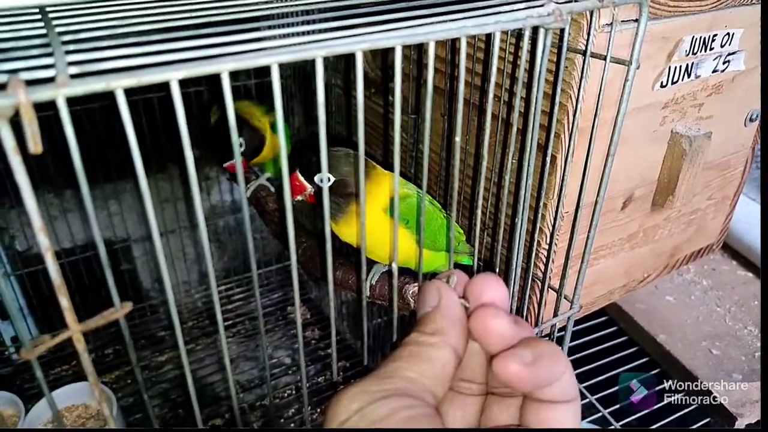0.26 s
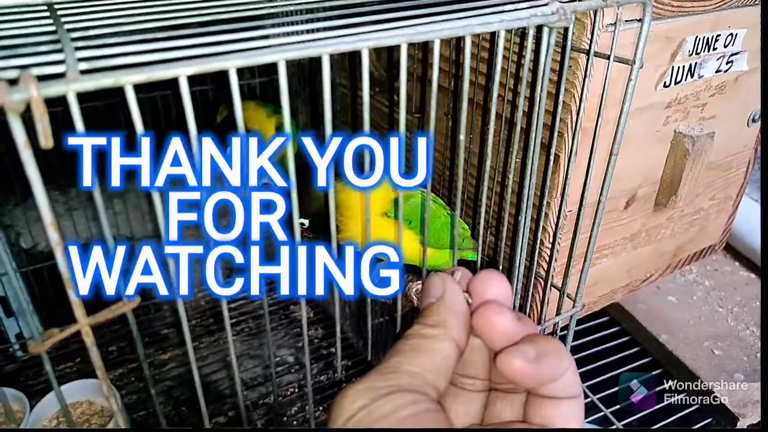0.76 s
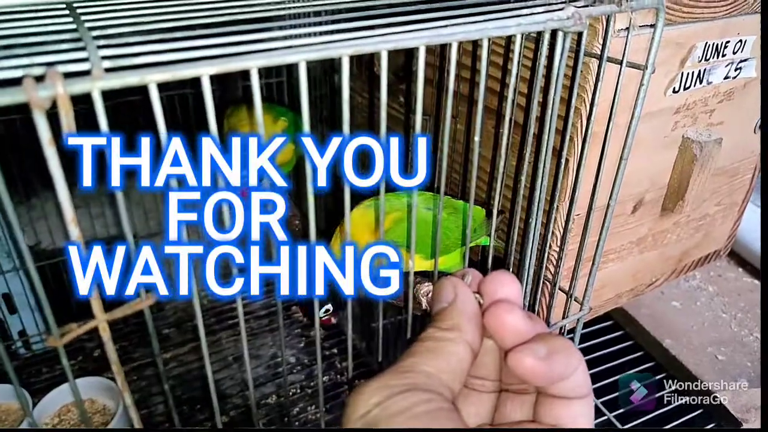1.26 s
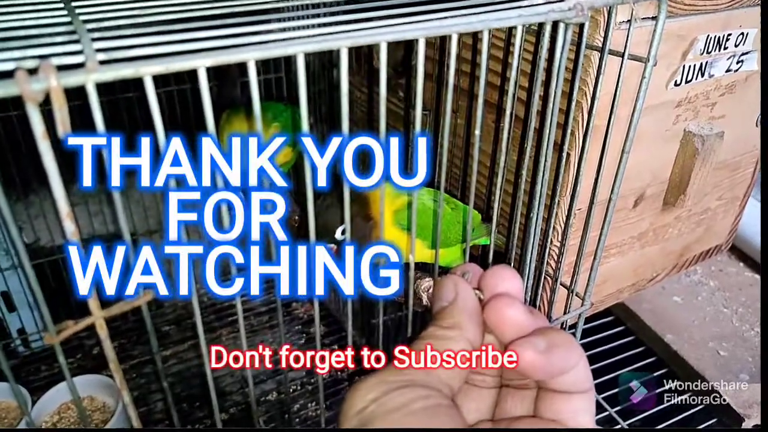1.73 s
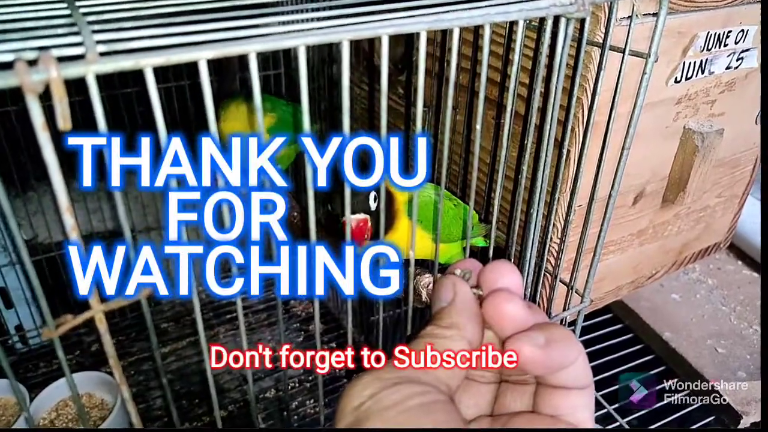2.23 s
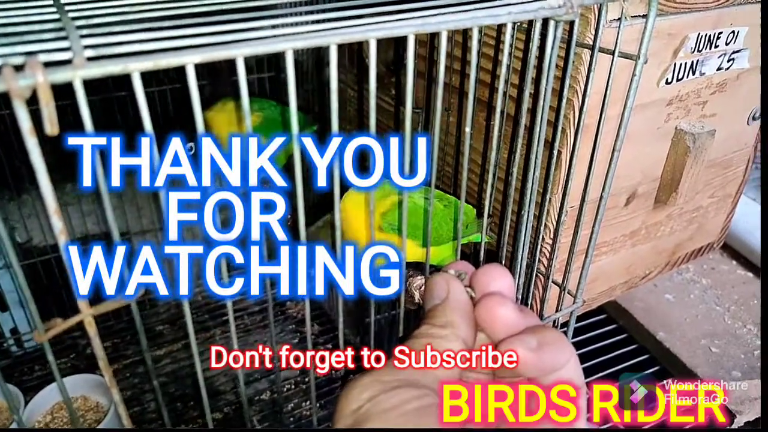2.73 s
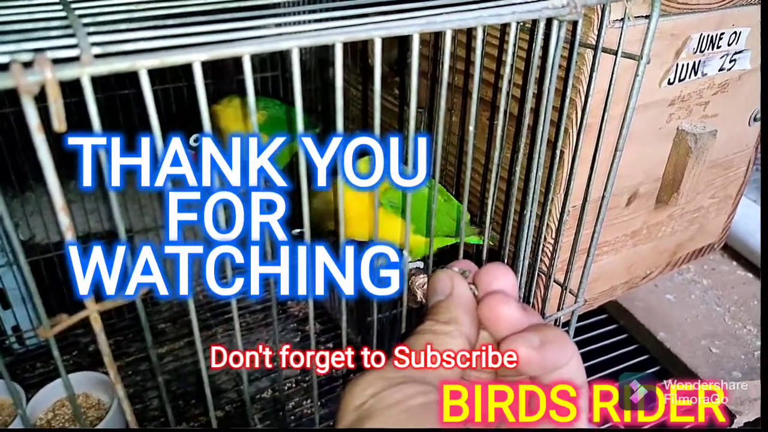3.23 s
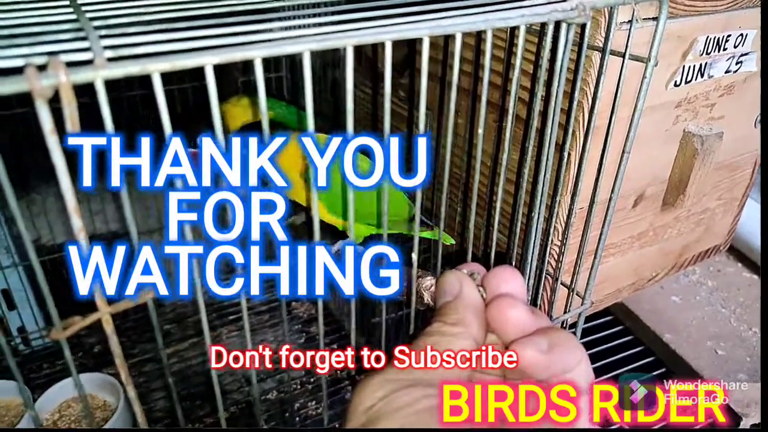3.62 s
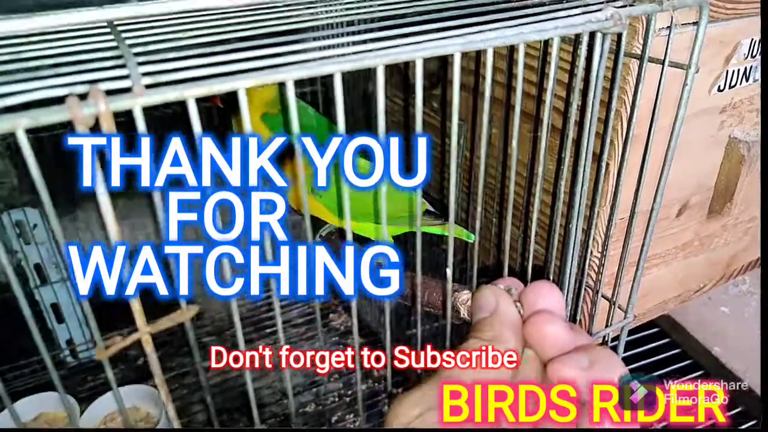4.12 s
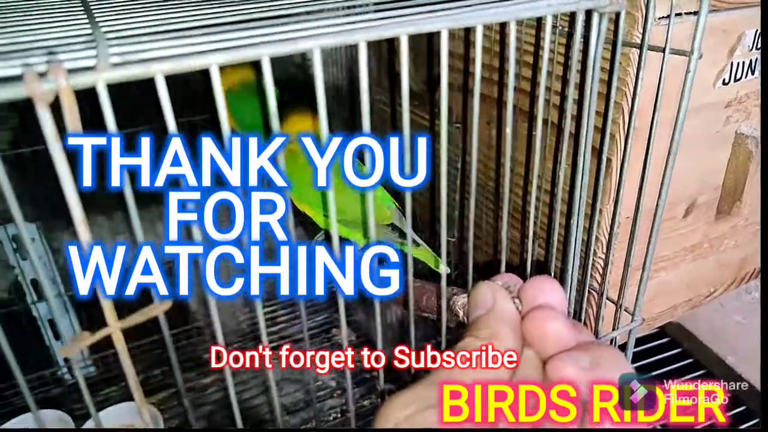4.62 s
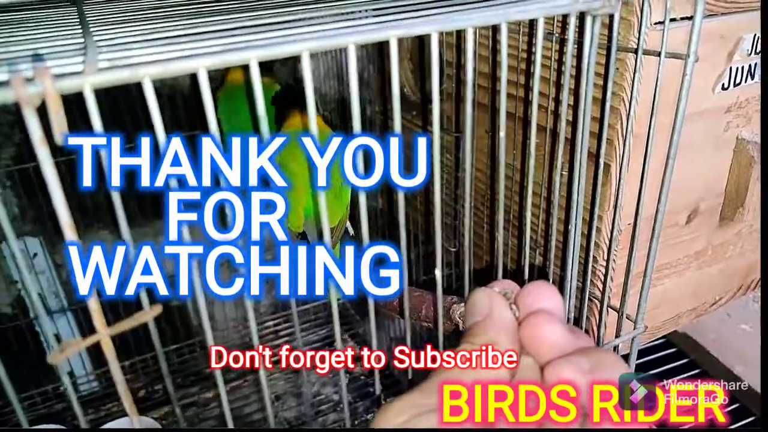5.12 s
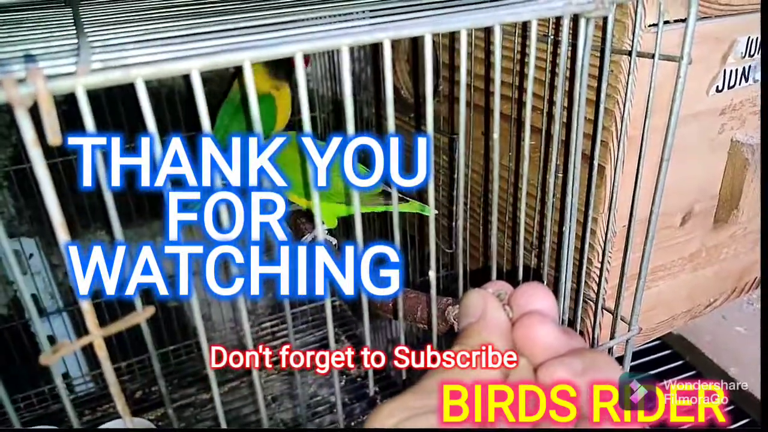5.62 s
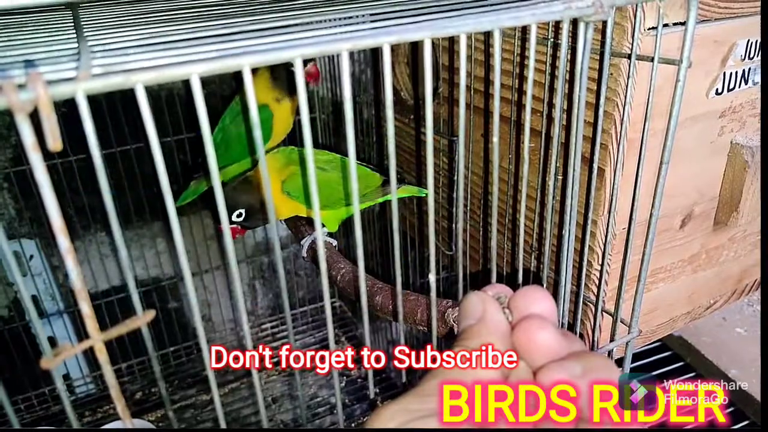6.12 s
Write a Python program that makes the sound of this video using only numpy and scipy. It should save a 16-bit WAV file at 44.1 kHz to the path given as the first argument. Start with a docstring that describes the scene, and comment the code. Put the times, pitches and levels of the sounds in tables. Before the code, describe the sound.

Small parrots give clipped, raspy squawks and thin chirps in bursts, with dull wooden knocks, soft rustling and low rumble around them.

```python
"""Small parrots in a roofed aviary

Parrots squawk, chirp and sound a few soft level tones, some loud and some faint, around a hand-held phone.
Each note is a gliding or level, rough stack of partials (sine waves), with a short echo from hard walls.
Noisy knocks shake a wooden perch, a hollow panel booms, a beak ticks and feathers and husks rustle.
Under it all lie a low outdoor rumble made of shaped noise and a wavering hum made of narrow noise bands."""
import sys
import numpy as np
from scipy import signal
from scipy.fft import rfft, irfft
from scipy.io import wavfile
from scipy.ndimage import uniform_filter1d, minimum_filter1d

SR = 44100
rng = np.random.default_rng(int(sys.argv[2]) if len(sys.argv) > 2 else 0)


def log_audio(samples):
    """Write samples as a 16-bit WAV file to the path given in sys.argv[1]."""
    # one column per channel
    frames = np.atleast_2d(samples).T
    # limit to full scale, then quantise
    limited = np.clip(frames, -1, 1)
    pcm = np.round(limited * 32767).astype(np.int16)
    wavfile.write(sys.argv[1], SR, pcm)


N = 280693  # length of the scene in samples
TOP_HZ = 14200  # the phone passes nothing much above this

# what beak, air and microphone do to a partial: (frequency [Hz], level [dB])
VOICE_COLOUR = [(800, -4.5), (2000, -1), (2900, -1), (3800, -1), (4800, -0.5), (6200, -1.5), (7300, 0),
                (8500, -9), (10200, -14.5), (11800, -6.5), (13300, -8.5), (14200, -20.5)]


def birds():
    """Squawks, chirps and level tones: each note has its own voice and is heard from its own place."""
    # squawks, loud to very faint, mostly rich in partials: (time [s], length [s], first pitch [Hz],
    # pitch it settles to [Hz], level [dB], brightness [dB], roughness [0-1], left minus right [dB])
    squawk_notes = [ (0.000, 0.0179, 4400, 3200, -19, -9, .55, -1),
                    (0.524, .012, 4050, 4040, -19, 0, 0.16, 2),
                    (0.529, 0.018, 3750, 4400, -12, -0.5, 0.49, -.5),
                    (0.588, 0.051, 2338, 2486, -23.5, 6.5, 0.47, 3),
                    (0.607, 0.018, 2925, 2980, -16, 1, 0.69, 0), (0.630, .051, 3193, 3106, -23, 7, 0.74, 0),
                    (0.646, .14, 2496, 2590, -30.5, 7, 0.66, -1),
                    (0.811, 0.028, 2302, 2436, -31, 12.5, 0.79, 3.5),
                    (0.828, 0.035, 3124, 3268, -13.5, -2.5, 0.59, 1.5),
                    (0.853, 0.04, 2565, 2672, -29.5, 12.5, 0.81, -1),
                    (1.044, 0.045, 3030, 2896, -40.5, -8, 0.46, 1),
                    (1.212, 0.025, 2650, 2243, -32, 3.5, .65, 4.5),
                    (1.224, 0.028, 2960, 3080, -18, 2.5, 0.33, 2),
                    (1.227, 0.033, 2616, 2680, -30, 10.5, 0.48, -1),
                    (1.250, 0.041, 3365, 3122, -26, 12.5, 0.41, -2.5),
                    (1.625, .027, 3200, 2940, -53, -1.5, .55, -2),
                    (2.212, 0.033, 1895, 1940, -63, 9, .05, -3),
                    (3.113, .073, 2450, 2305, -56, -3, 0.78, -1),
                    (3.511, 0.0304, 2810, 2134, -25.5, -0.5, 0.65, 2.5),
                    (3.525, 0.031, 2800, 2830, -16, 3, 0.54, 0.5),
                    (3.551, 0.028, 3367, 3067, -26, 10.5, 0.76, -3),
                    (3.596, 0.04, 2290, 2230, -28.5, 5.5, 0.53, -2),
                    (3.616, 0.019, 3440, 3330, -33, 24.5, 0.46, -4),
                    (3.653, 0.026, 2635, 2653, -27, 10.5, 0.47, 1),
                    (3.677, .025, 3220, 2914, -31, 16.5, .55, -2),
                    (3.830, 0.013, 2620, 2550, -27, 6.5, 0.66, 5.5),
                    (3.840, 0.021, 2105, 2138, -23.5, 4, .5, -0.5),
                    (3.847, 0.026, 2717, 2896, -17, 8.5, 0.48, 6),
                    (3.874, 0.036, 2937, 2940, -27.5, 13, 0.38, -6.5),
                    (3.967, 0.0066, 3000, 4110, -17, -7, 0.18, 0),
                    (3.972, 0.013, 4070, 3830, -22.5, -2.5, 0.06, -2.5),
                    (4.113, .011, 2850, 2680, -28, 3, 0.2, -1),
                    (4.255, 0.027, 2715, 2502, -34.5, 9.5, 0.43, -0.5),
                    (4.381, 0.027, 2627, 2557, -36.5, 5.5, 0.47, -.5),
                    (4.505, .025, 2552, 2370, -30.5, 8.5, 0.33, -2.5),
                    (4.915, 0.016, 2630, 2500, -28.5, 1, 0.6, 6),
                    (4.921, 0.027, 2284, 2337, -24.5, 5, 0.39, 0),
                    (4.929, 0.026, 2847, 2840, -18, 3, 0.46, 4),
                    (4.945, 0.017, 2696, 3340, -23, 6, 0.73, -2),
                    (4.970, 0.04, 2886, 2960, -34, 13.5, 0.81, -3),
                    (5.233, .027, 1410, 1420, -52.5, 8, 0.36, .5),
                    (5.535, 0.085, 3168, 2980, -37, -8.5, 0.34, 1.5),
                    (5.776, 0.068, 3240, 3160, -45, -10, 0.47, -1),
                    (5.812, .12, 3140, 3202, -36.5, -5.5, 0.3, -1),
                    (6.069, 0.028, 1635, 1542, -46, 5.5, 0.45, -.5),
                    (6.200, 0.019, 1840, 1753, -35.5, 4.5, 0.38, 0.5),
                    (6.301, 0.0086, 2510, 2533, -22.5, 6, .25, -2),
                    (6.304, 0.018, 2850, 3080, -19, -1, .1, -1.5), ]
    # chirps, thin and nearly whistled: same columns as the squawks
    chirp_notes = [ (0.197, .04, 2900, 3000, -51, 3.5, 0.6, -2),
                   (0.352, .062, 4080, 4390, -45, -4, 0.61, -1),
                   (0.394, 0.035, 3906, 4620, -30, -2.5, 0.3, -1),
                   (0.541, 0.027, 6020, 5170, -18, -1, 0.4, 0),
                   (0.662, .12, 3037, 3040, -21.5, -6.5, 0.61, -0.5),
                   (0.861, .071, 3030, 3130, -32.5, 3.5, 0.83, -6),
                   (1.103, .038, 4450, 4280, -41, -1.5, 0.37, 0),
                   (1.130, 0.035, 4070, 4260, -34.5, -7, .3, -4),
                   (1.779, .028, 4600, 4680, -48, -10, 0.4, 5),
                   (1.802, 0.038, 4180, 4760, -31.5, -3.5, 0.3, -1),
                   (1.803, 0.02, 4230, 4030, -38, -7, 0.49, -2),
                   (1.998, 0.05, 4420, 4340, -43, -3, 0.37, 1),
                   (2.040, 0.038, 4400, 3490, -43.5, -6.5, 0.58, -3),
                   (2.721, .027, 4480, 4650, -39, 1, 0.3, 2), (2.738, 0.023, 4510, 4250, -37, -6, 0.57, -2),
                   (2.744, .027, 4520, 4970, -33, -2.5, 0.2, -4),
                   (2.870, 0.038, 3557, 3460, -51.5, -7, 0.35, -1),
                   (2.930, 0.077, 4560, 4600, -42, 1, 0.26, 1),
                   (2.962, 0.044, 4800, 3135, -40.5, -4, 0.23, -2),
                   (3.388, 0.087, 4570, 4730, -45, -7, 0.4, -0.5),
                   (3.445, .023, 4220, 3770, -41.5, -14, 0.5, -7),
                   (3.450, 0.045, 4290, 4520, -31.5, -2, .3, -1),
                   (4.264, 0.0098, 5750, 5910, -21, -4.5, 0.1, -1),
                   (4.455, 0.017, 4220, 4480, -35, -6, 0.66, 0),
                   (4.474, 0.044, 4595, 4690, -32, -3, 0.45, 4),
                   (4.752, .03, 5200, 4060, -32, -1, 0.43, -1), (5.126, .042, 4100, 4490, -37, 3, 0.43, .5),
                   (5.621, 0.04, 4440, 4690, -38.5, 0, .45, 1),
                   (5.660, .022, 4305, 4590, -30.5, 0, 0.46, -1),
                   (5.841, 0.062, 4410, 4490, -42, 5, 0.42, 0),
                   (6.218, .011, 6620, 6450, -16, -7, .02, -4.5), ]
    # soft level tones: two low hoots, and two half-pitch undertones of the squawks near 5.6 and 5.8 s:
    # (time [s], length [s], pitch [Hz], level [dB])
    tone_notes = [(2.203, 0.082, 830, -42), (2.756, 0.14, 596, -55.5), (5.567, 0.17, 1595, -53),
                  (5.780, .074, 1598, -51)]
    # each voice: (swell [s], extra swell of a rising note [share of its length],
    # upper partials at brightness 0 [dB], upper partials per dB of brightness [dB], added to the rasp [dB])
    squawk_voice = (.0025, 0.11, -2, 0.73, 0.8)
    chirp_voice = (0, 0.28, -19, .4, 2.5)
    tone_voice = (0.1, .1, -18, 2, -5)
    tone_bright_db, tone_rough = -7, 0.1

    out = np.zeros((2, N))
    for notes, voice in ((squawk_notes, squawk_voice), (chirp_notes, chirp_voice)):
        for start, length, first_hz, last_hz, db, bright_db, rough, pan_db in notes:
            sung = call(length, first_hz, last_hz, bright_db, rough, voice)
            add(out, start, undb(db) * heard(sung, pan_db))
    for start, length, hz, db in tone_notes:
        sung = call(length, hz, hz, tone_bright_db, tone_rough, tone_voice)
        add(out, start, undb(db) * heard(sung))
    return out


def call(length, first_hz, last_hz, bright_db, rough, voice):
    """One note: rising ones swell in longer; brightness sets the partials, roughness the rest."""
    # a rougher voice has more of all three: (when clear, when fully rough)
    half_order_ends = (-32.5, 6.5)  # lines between the partials [dB]
    rasp_ends = (-25, 4.5)  # rasping air [dB]
    shake_ends = (.02, .8)  # shakiness [0-1]

    swell, rising_share, upper_db, upper_slope, air_db = voice
    if last_hz > first_hz:
        swell = swell + rising_share * length
    half_db = np.interp(rough, (0, 1), half_order_ends)
    rasp_db = np.interp(rough, (0, 1), rasp_ends) + air_db
    shaky = np.interp(rough, (0, 1), shake_ends)
    upper_db = upper_db + upper_slope * bright_db
    return note(length, swell, first_hz, last_hz, bright_db, upper_db, half_db, rasp_db, shaky)


def note(length, swell, first_hz, last_hz, second_db, upper_db, half_db, rasp_db, shaky):
    """The syrinx (a bird's voice box): a settling glide, shaky pitch, fluttering strength, rasping air."""
    size = int(SR / 8)
    t = np.arange(size) / SR
    hz = last_hz + (first_hz - last_hz) * np.exp(-2.5 * t / length)
    hz = hz * (1 + 0.1 * shaky * walk(897, size=size))
    phase = 2 * np.pi * np.cumsum(hz) / SR

    fade_in = np.clip(t / max(swell, 1 / SR), 0, 1)
    fade_out = np.clip((1 - t / length) / 0.46, 0, 1)
    flutter = undb(12.7 * shaky * np.tanh(walk(414, size=size)))

    voice = undb(rasp_db) * airy(size, 0.83 * min(first_hz, last_hz))
    for k in np.arange(0.5, 10, 0.5):
        # strong and weak cycles in turn put extra lines halfway between the partials
        if k % 1 == 0:
            db = (0, second_db, upper_db)[min(int(k), 3) - 1]
        else:
            db = half_db
        db = db - 0.51 * max(k - 3, 0)  # higher partials get weaker
        db = db - 27.4 * (k < 1)  # very little below the pitch itself
        db = db + on_log(VOICE_COLOUR, k * hz)
        passed = k * last_hz < TOP_HZ
        voice = voice + np.sqrt(2) * passed * undb(db) * np.sin(k * phase + k * k)
    return voice * fade_in * fade_out * flutter


def knocks():
    """Dull knocks and flaps on perches and wire: noisy bumps that also make the wood ring."""
    # (time [s], level [dB], time for the scuff to fade to about a third [s], wooden body [dB])
    knock_list = [(0.03, -37, 0.056, 3), (0.147, -38.5, 0.059, 4.5), (0.663, -34.5, 0.014, 5.5),
                  (1.194, -45.5, .071, 4.5), (1.292, -38.5, .017, 5.5), (1.52, -49.5, 0.013, 2),
                  (1.717, -44.5, .011, 4.5), (1.918, -34.5, .04, -2), (2.959, -47, .015, 8),
                  (3.381, -34, 0.018, 1), (3.605, -40, 0.086, 1), (3.987, -39.5, .022, -4),
                  (4.044, -35, 0.02, 5.5), (4.555, -43.5, 0.027, 3.5), (4.798, -43.5, 0.051, 4),
                  (5.698, -44, 0.037, -7), (5.827, -43, .038, -1.5)]
    # what the wooden perch rings with: (frequency [Hz], relative level [dB], time to fade by 60 dB [s])
    perch_modes = [(248, 2, 0.036), (346.6, 5.5, 0.04), (448, -2, 0.091), (927, 4, 0.015)]
    scuff_lo_hz, scuff_hi_hz, scuff_db = 430, 1500, 14

    out = np.zeros((2, N))
    t = np.arange(SR // 2) / SR
    perch = sum(undb(db - 60 * t / t60) * np.sin(2 * np.pi * hz * t) for hz, db, t60 in perch_modes)
    perch = perch / np.sqrt(np.sum(perch ** 2))
    for start, db, length, body_db in knock_list:
        # a short hard start on top of a longer fade
        fade = np.exp(-t / max(length, 0.002)) + 0.66 * np.exp(-t / 0.0019)
        unsteady = undb(1.8 * walk(68, size=len(t)))
        bump = rng.standard_normal(len(t)) * fade * unsteady
        body = band(signal.fftconvolve(bump, perch)[:len(t)], 207, 1560)
        scuff = band(bump, scuff_lo_hz, scuff_hi_hz)
        add(out, start, undb(db) * heard(undb(scuff_db) * scuff + undb(body_db) * body))
    return out


def booms():
    """A hollow panel booms: one low tone that builds quickly and dies away, the same at both ports."""
    # (time [s], level [dB])
    boom_list = [(0.0, -27.5), (0.148, -27.5), (0.249, -30.5), (4.046, -27.5)]
    panel_hz, panel_t60_s = 125.7, 0.5

    out = np.zeros((2, N))
    t = np.arange(SR // 2) / SR
    ring = np.sin(2 * np.pi * panel_hz * t) * undb(-60 * t / panel_t60_s)
    ring = ring * (1 - np.exp(-t / 0.0034))
    for start, db in boom_list:
        add(out, start, undb(db) * np.array([ring, ring]))
    return out


def ticks():
    """Beak ticks: single bright clicks made of a very short burst of noise."""
    # (time [s], level [dB])
    tick_list = [(2.4227, -33), (2.607, -32)]

    out = np.zeros((2, N))
    t = np.arange(400) / SR
    for start, db in tick_list:
        burst = rng.standard_normal(400) * np.exp(-t / 0.00071)
        add(out, start, undb(db) * heard(band(burst, 4500, 11400)))
    return out


def rustle():
    """Feathers and husks rustle: a soft bright stir of noise, unrelated at the two ports."""
    # (time [s], level [dB])
    rustle_level = [(0, -45), (.4, -53), (1.0, -58), (1.4, -55), (1.64, -59.5), (1.8, -51), (2.25, -51),
                    (2.36, -66), (2.6, -63), (2.68, -50.5), (2.9, -52), (3.15, -62), (3.3, -49), (4.1, -57),
                    (4.7, -49), (5.3, -66), (5.55, -67), (5.74, -49), (6.0, -57.5), (6.36, -42)]

    db = np.interp(np.arange(N) / SR, *np.transpose(rustle_level))
    return np.array([airy(N, 1700), airy(N, 1700)]) * undb(db + 0.55 * walk(27))


def rumble():
    """Outdoor rumble: octave bands of noise that swell together and flicker alone."""
    # colour of the rumble: (frequency [Hz], relative level [dB])
    rumble_colour = [(35, -9.5), (60, -0.5), (82, -4.5), (171, -12), (239, -9.5), (372, -13), (542, -16.5),
                     (825, -17.5), (1250, -22.5), (1650, -21), (5110, -36), (7610, -36.5), (9000, -38),
                     (11700, -69), (19800, -120)]
    rumble_db = -43.5

    swell = walk(0.98)
    f = np.fft.rfftfreq(N, 1 / SR)
    spectrum = rfft(ports(*rng.standard_normal((2, N)))) * undb(on_log(rumble_colour, f))
    out = 0
    for hz in 25 * 2. ** np.arange(10):
        octaves_away = np.log2(np.maximum(f, 1) / hz)
        octave = np.cos(np.pi / 2 * np.clip(octaves_away, -1, 1)) ** 2
        flicker = 0.44 * walk(5.2)
        out = out + irfft(spectrum * octave, N) * undb(0.9 * swell + flicker)
    return unit(out) * undb(rumble_db)


def hum():
    """A low hum: narrow bands of noise that waver in level, the same at both ports."""
    # (centre [Hz], width [Hz], level before the wavering [dB])
    hum_bands = [(27.5, 8.8, -43), (59.35, 11.6, -45.5), (123.5, 17, -55)]
    # how the hum wavers: (time [s], level change [dB])
    hum_waver = [(0, 4), (.8, 1), (1.5, -3.5), (2.3, -4), (3.0, 0), (4.0, -0.5), (5.0, -1.5), (6.36, 1.5)]

    tone = 0
    for hz, width, db in hum_bands:
        tone = tone + undb(db) * unit(band(rng.standard_normal(N), hz - width / 2, hz + width / 2))
    return tone * undb(np.interp(np.arange(N) / SR, *np.transpose(hum_waver)))


def heard(x, pan_db=0.):
    """A sound from its own place: the direct wave, then a diffuse tail unlike at the two ports."""
    t60_low_s, t60_high_s, split_hz = 0.33, 0.2, 2000  # time to fade by 60 dB, below and above the split
    direct_db, build_s = -2, 0.0034  # direct wave against the tail; how fast the tail builds

    t = np.arange(SR // 2) / SR
    hiss = ports(*rng.standard_normal((2, len(t))))
    low = signal.sosfilt(signal.butter(1, split_hz, fs=SR, output="sos"), hiss)
    high = hiss - low
    tail = low * undb(-60 * t / t60_low_s) + high * undb(-60 * t / t60_high_s)
    tail *= 1 - np.exp(-t / build_s)
    tail /= np.sqrt(np.mean(np.sum(tail ** 2, axis=1)))
    # the direct wave has its own small random delay at each port
    tail[[0, 1], rng.integers(0, 20, size=2)] += undb(direct_db)
    pan = undb(np.array([[pan_db], [-pan_db]]) / 2)
    return signal.fftconvolve(x[None], tail, axes=1) * pan


def ports(mid, side):
    """Two ports a hand apart: diffuse sound is alike in the bass and unrelated in the treble."""
    size = mid.shape[-1]
    ratio = (np.fft.rfftfreq(size, 1 / SR) / 600) ** 1.5  # the ports part ways around 600 Hz
    side = irfft(rfft(side) * np.tanh(np.sqrt(ratio)), size)
    return np.array([mid + side, mid - side]) / np.sqrt(2)


def airy(size, low_hz):
    """Noise with the colour of the voices, falling away steeply under low_hz."""
    f = np.fft.rfftfreq(size, 1 / SR)
    spectrum = rfft(rng.standard_normal(size)) * undb(on_log(VOICE_COLOUR, f))
    return unit(irfft(spectrum / (1 + (low_hz / (f + 1)) ** 12), size))


def walk(rate, size=N):
    """Smooth random wander of spread 1: noise averaged twice over 1 / rate seconds."""
    k = max(int(SR / rate), 2)
    smooth = uniform_filter1d(uniform_filter1d(rng.standard_normal(size + 2 * k), k), k)
    return unit(smooth[k:k + size])


def band(x, lo_hz, hi_hz):
    """Keep only the sound between two frequencies."""
    sos = signal.butter(2, [lo_hz, min(hi_hz, 0.45 * SR)], "bandpass", fs=SR, output="sos")
    return signal.sosfilt(sos, x)


def on_log(table, hz):
    """Read a (frequency [Hz], level [dB]) table on a log-frequency axis."""
    f, v = np.transpose(table)
    return np.interp(np.log(np.maximum(hz, 1)), np.log(f), v)


def undb(db):
    """Turn decibels into a plain amplitude factor."""
    return 10 ** (np.asarray(db) / 20)


def unit(x):
    """Scale a sound to an average strength (RMS) of 1."""
    return x / np.sqrt(np.mean(x ** 2))


def add(out, start, x):
    """Mix a two-port sound into out from its start [s], cut at the end of the scene."""
    i = int(start * SR)
    out[:, i:i + x.shape[1]] += x[:, :N - i]


def scene():
    """Birds in front, then the cage noises, the rustle, the rumble and the hum."""
    cage = knocks() + booms() + ticks()
    return birds() + cage + rustle() + rumble() + hum()


def record(dry):
    """The phone: a quick limiter turns down the loudest peaks, then a steep filter cuts the top."""
    limit = 0.97  # of full scale
    room = np.minimum(limit / (np.max(np.abs(dry), axis=0) + 1e-9), 1)
    gain = uniform_filter1d(minimum_filter1d(room, size=129), size=65)
    return signal.sosfilt(signal.ellip(10, 0.2, 90, TOP_HZ, fs=SR, output="sos"), gain * dry)


dry = scene()
out = record(dry)
log_audio(out)
```